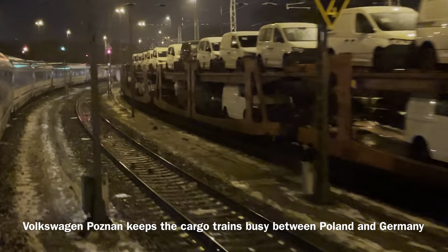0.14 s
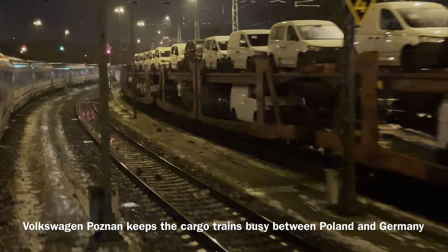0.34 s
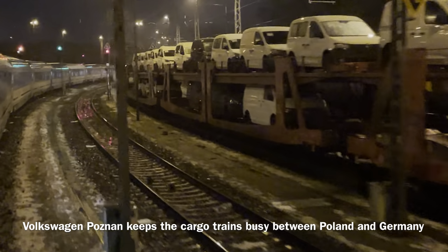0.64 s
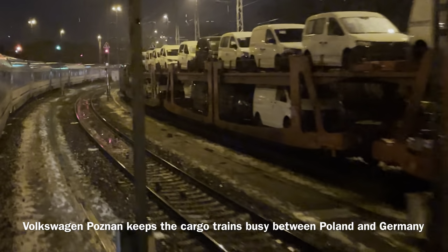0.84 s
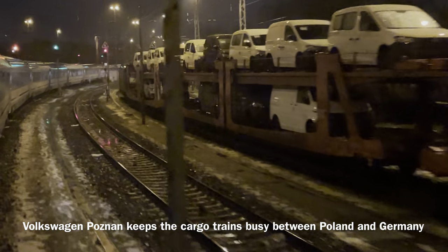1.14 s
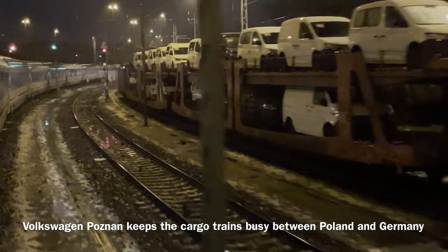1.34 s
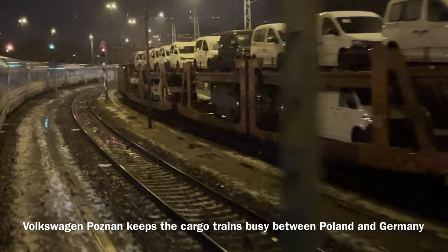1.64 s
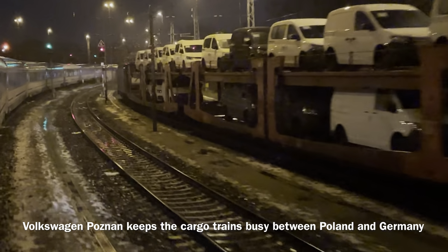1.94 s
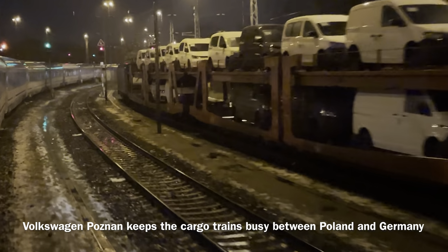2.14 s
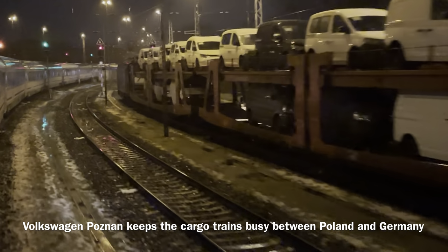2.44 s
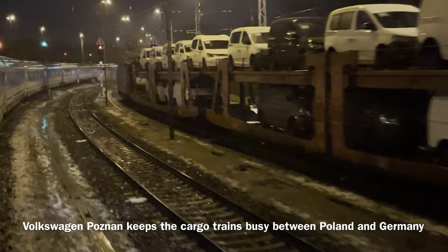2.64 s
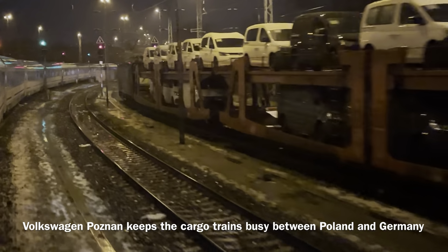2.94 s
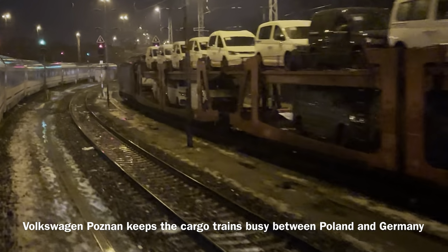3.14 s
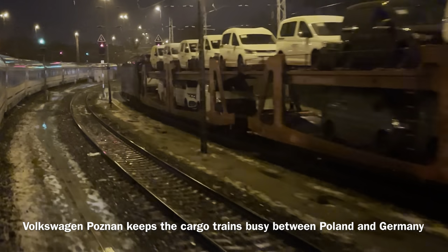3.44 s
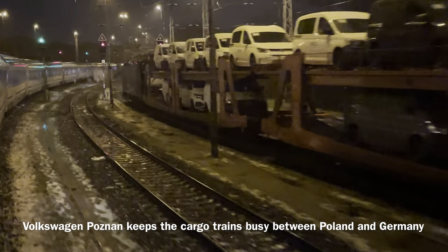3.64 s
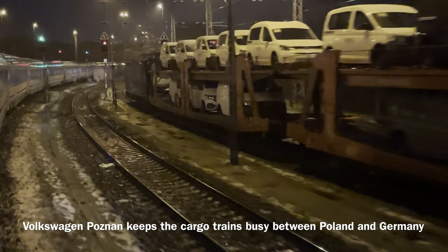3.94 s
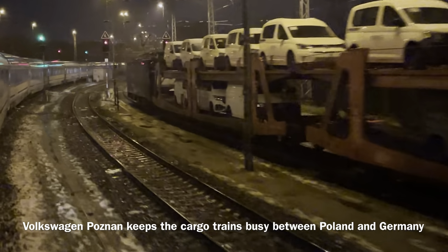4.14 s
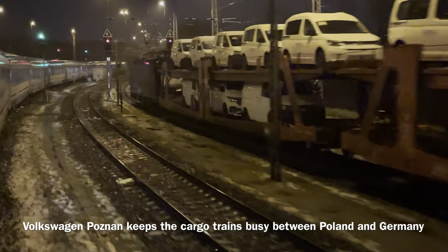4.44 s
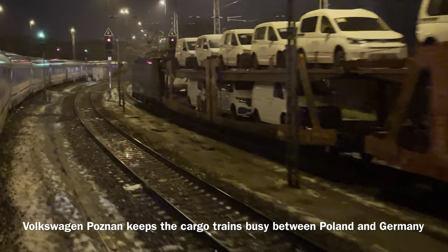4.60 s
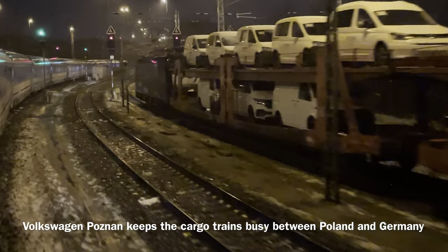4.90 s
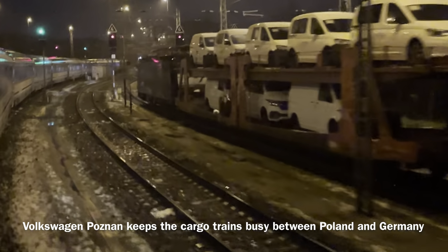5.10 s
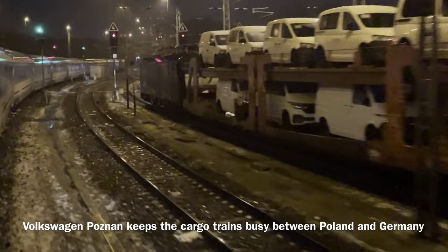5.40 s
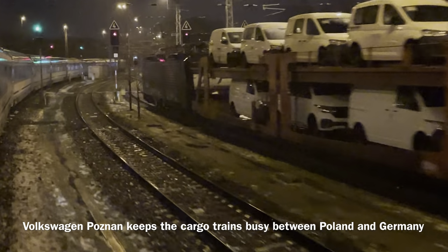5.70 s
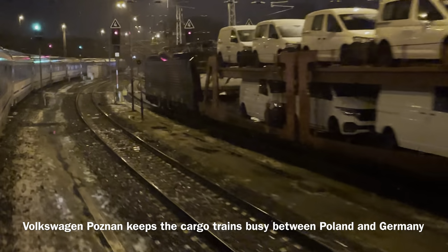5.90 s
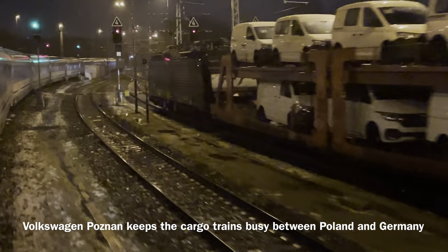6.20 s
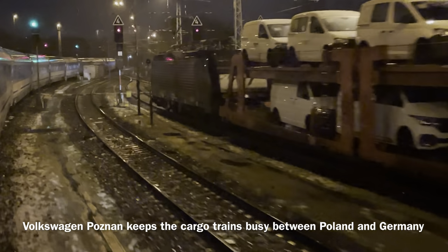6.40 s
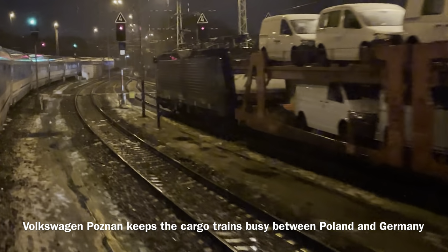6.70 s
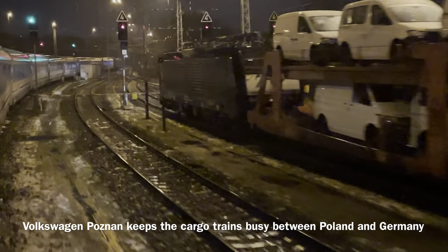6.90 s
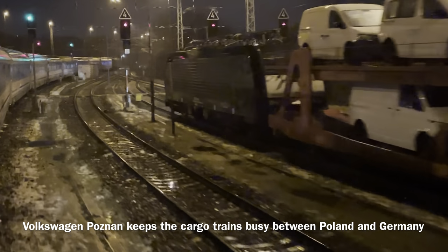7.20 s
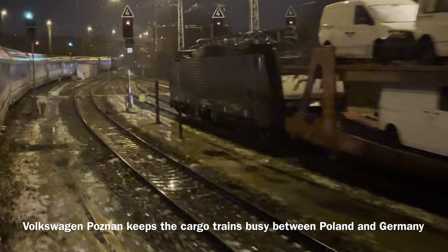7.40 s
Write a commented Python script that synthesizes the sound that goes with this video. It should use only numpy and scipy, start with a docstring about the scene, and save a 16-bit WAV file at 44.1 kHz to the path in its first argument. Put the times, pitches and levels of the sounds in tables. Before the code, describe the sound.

Heard at the window inside a passenger train rolling through a yard at night: a deep swaying rumble and juddering wheel roar, crowded with uneven knocks ringing dully through wall panels. A high airy whine with thin wavering whistles runs throughout. The fan noise of a locomotive on the next track gradually comes closer, and a sharp, bright knock stands out near the end.

```python
"""The wheels of a passenger train rumble through a yard at night, heard at a window.
Shaped noise makes the rumble, the heaves and the rolling roar; short blows knock through the panels.
A blower whines above: noise gives its hiss and duct resonances, wavering sines its thin whistles.
The fans of a locomotive on the next track, noise and one tone, slowly draw near.
"""
import sys
import numpy as np
from scipy.fft import rfft, irfft, next_fast_len
from scipy.io import wavfile
from scipy.ndimage import uniform_filter1d, map_coordinates

SR = 44100
rng = np.random.default_rng(int(sys.argv[2]) if len(sys.argv) > 2 else 0)


def transcribe(signal):
    """Save signal, clipped to [-1, 1], as a 16-bit WAV file at the path in sys.argv[1]."""
    frames = np.atleast_2d(signal).T
    limited = np.clip(frames, -1, 1)
    pcm = np.round(limited * 32767).astype(np.int16)
    wavfile.write(sys.argv[1], SR, pcm)


N = 332955


def amp(db):
    """Turn decibels into a gain."""
    return 10 ** (np.asarray(db) / 20)


def unit(x):
    """Scale to rms 1."""
    return x / np.sqrt(np.mean(x ** 2) + 1e-20)


def along(points, hz):
    """Read a value between (frequency, value) points, on a log frequency axis."""
    point_hz, values = np.transpose(points)
    return np.interp(np.log(hz + 1), np.log(point_hz + 1), values)


def curves(rows):
    """Give one value per sample for each column after the time."""
    times, *columns = np.transpose(rows)
    return [np.interp(np.arange(N) / SR, times, column) for column in columns]


def wobble(rate):
    """A smooth random curve through `rate` random points a second."""
    points = rng.standard_normal(int(N * rate / SR) + 4)
    return map_coordinates(points, [np.arange(N) * rate / SR])


def swell(s, rise, fall):
    """A bell-shaped envelope that peaks at time s; rise and fall in seconds."""
    t = np.arange(N) / SR - s
    return np.exp(-(t / np.where(t < 0, rise, fall)) ** 2)


def filtered(x, response):
    """Shape the spectrum of x by a complex response of frequency."""
    size = next_fast_len(N + SR // 2)
    hz = np.fft.rfftfreq(size, 1 / SR)
    return irfft(rfft(x, size) * response(hz), size)[..., :N]


def steadied(x, span):
    """Even out the chance swells of x that last longer than span seconds, near rms 1."""
    power = np.mean(x ** 2, axis=0)
    for _ in range(2):
        power = np.abs(uniform_filter1d(power, max(int(span * SR), 1)))
    return x / np.sqrt(power + 1e-20)


def tone(hz, waver_hz):
    """A sine of rms 1 whose pitch wavers."""
    pitch = hz + waver_hz * wobble(40)
    return np.sqrt(2) * np.sin(2 * np.pi * np.cumsum(pitch) / SR)


# how alike left and right are: (frequency [Hz], likeness [0 to 1])
LIKENESS = [(60, 0.92), (250, 0.88), (500, 0.86), (800, 0.34), (1250, 0.059), (1600, 0.67), (2000, 1),
            (4500, 1), (5600, 0.85), (6500, 0.89), (8300, 0.95), (10000, 0.54), (12500, 0.99)]


def diffuse(gain):
    """Noise of density gain(Hz) on the left and right, made partly alike by mixing mid and side."""
    def shape(hz):
        turn = np.arccos(np.clip(along(LIKENESS, hz), 0, 1)) / 2
        return gain(hz) * np.array([np.cos(turn), np.sin(turn)])

    white = rng.standard_normal((2, N)) * np.sqrt(SR / 2)
    mid, side = filtered(white, shape)
    return np.array([mid + side, mid - side])


def bending(hz, spread=0.00362, dispersion=0.751, lead=0.00364):
    """Bending waves cross the panels: the treble arrives first, the thud last."""
    ratio = np.maximum(hz, 50) / 420
    delay = spread * ratio ** -dispersion - lead  # seconds
    return np.exp(-2j * np.pi * np.cumsum(delay) * (hz[1] - hz[0]))


# ringing of the wall panels: (frequency [Hz], width [Hz], level [dB])
PANEL_MODES = [(241.7, 13.7, 2.5), (528, 27, -15.5)]


def panels(hz):
    """The wall panels pass a blow on and ring after it."""
    ring = 1
    for centre, width, db in PANEL_MODES:
        ring = ring + amp(db) * 1j * hz * width / (centre * centre - hz * hz + 1j * hz * width)
    return ring * bending(hz)


# how hard the track shakes the car, before gains:
# (time [s], bass level [dB], rolling noise level [dB])
RIDE_LEVELS = [(0, -36, -34), (.5, -37.5, -34), (1.01, -39.5, -38.5), (1.8, -38, -34.5),
               (2.71, -31.5, -32.5), (3.15, -38, -34.5), (3.66, -29, -34), (3.9, -34, -36.5),
               (4.45, -31, -34), (4.8, -31.5, -36), (5.23, -37, -32.5), (5.7, -33, -33), (6.4, -34, -31.5),
               (6.83, -37, -34.5), (7.19, -25.5, -31.5), (7.55, -30, -33)]
# colour of the car body's boom: (frequency [Hz], relative density [dB])
BOOM_COLOUR = [(12, -39), (25, -11), (38, -7.5), (55, 0.8), (80, 0.5), (120, -5.5), (180, -14.5),
               (300, -35), (600, -82)]
# low thumps as the car body heaves on its bogies: (time [s], level before gain [dB])
HEAVE_THUMPS = [(.48, -29), (.71, -30), (.93, -26.5), (1.14, -29.5), (1.26, -31.5), (1.37, -28),
                (1.47, -27), (1.91, -29), (2.16, -22.5), (2.31, -27.5), (2.43, -24), (3.19, -22),
                (3.34, -28.5), (3.56, -24), (4.48, -26.5), (5.45, -28), (5.75, -26), (6.35, -26.5),
                (6.48, -22), (6.67, -24), (7.01, -25), (7.19, -24), (7.3, -26), (7.45, -27)]
HEAVE_RISE_S, HEAVE_FALL_S = 0.026, 0.034


def rumble(bed_db=1.0, heave_db=1.0, sway_db=2.5, sway_rate=18):
    """The car body booms on its bogies: a swaying bed, and a thump at each heave."""
    bass_db, _ = curves(RIDE_LEVELS)
    bed = amp(bass_db + bed_db + sway_db * wobble(sway_rate))
    heaves = sum(amp(db + heave_db) * swell(s, HEAVE_RISE_S, HEAVE_FALL_S) for s, db in HEAVE_THUMPS)
    boom = diffuse(lambda hz: amp(along(BOOM_COLOUR, hz)))
    return np.hypot(bed, heaves) * steadied(boom, span=0.07)


# colour of the rolling roar: (frequency [Hz], relative density [dB])
ROAR_COLOUR = [(80, -28), (140, -5.5), (190, -4.5), (240, -1.5), (320, -1.5), (400, -5), (510, -2.5),
               (620, -9.5), (820, -8), (1000, -15), (1350, -23.5), (1900, -34), (4000, -42.5)]
# colour of a blow, for the soft taps here and the knocks below: (frequency [Hz], relative level [dB])
BLOW_COLOUR = [(20, -25), (60, -9), (120, -3.5), (190, 2.5), (300, 4.5), (480, 1.5), (650, -7), (950, -16),
               (1400, -25), (2200, -35), (4000, -70)]


def rolling(gain_db=-0.44, judder_db=1.7, heave_db=1.4, taps_db=-3.0, taps_rate=26, scatter_db=4,
            soft_hz=560):
    """Rough steel rolls on steel: a juddering roar, with soft thuds from pits in the rail."""
    def thud(hz):
        softness = np.sqrt(1 + (hz / soft_hz) ** 6)
        return amp(along(BLOW_COLOUR, hz)) * panels(hz) / softness

    _, level_db = curves(RIDE_LEVELS)
    roar = diffuse(lambda hz: amp(along(ROAR_COLOUR, hz)))
    roar = roar * amp(judder_db * wobble(70) + heave_db * wobble(14))
    sizes = rng.choice([-1, 1], N) * amp(scatter_db * rng.uniform(-1.6, 1, N))
    pits = (rng.random(N) < taps_rate / SR) * sizes  # about taps_rate a second
    taps = filtered(pits, thud)
    return amp(level_db) * (amp(gain_db) * unit(roar) + amp(taps_db) * unit(taps))


# blower and duct resonances: (frequency [Hz], width [Hz], density [dB per Hz])
DUCT_RESONANCES = [(1532, 73, -74), (1645, 59, -71.5), (1755, 29, -76), (2263, 100, -77), (2790, 70, -77),
                   (2850, 72, -62), (2937, 193, -70), (3144, 193, -68), (3340, 140, -77),
                   (4124, 174, -75.5), (4255, 46, -74), (6062, 246, -78.5), (8330, 110, -77.5),
                   (12400, 300, -87.5)]
# colour of the air hiss: (frequency [Hz], density [dB per Hz])
HISS_COLOUR = [(500, -100), (1300, -83), (1900, -86), (2500, -83.5), (3700, -100.5), (4600, -93),
               (5500, -95), (7400, -95.5), (9000, -92), (10200, -100.5), (11500, -97), (12700, -99)]


def blower(duct_db=0, hiss_db=0, flutter_db=0.47):
    """Air hisses through the ducts and sings in their resonances."""
    def peaks(hz):
        power = 0
        for centre, width, db in DUCT_RESONANCES:
            power = power + (amp(db) / (1 + ((hz - centre) / width) ** 2 * 2)) ** 2
        return np.sqrt(power)

    song = diffuse(peaks) * amp(duct_db + flutter_db * wobble(14))
    hiss = diffuse(lambda hz: amp(along(HISS_COLOUR, hz)))
    return song + hiss * amp(hiss_db + 0.33 * wobble(8))


# strongest whistle, before gain and wavering: (time [s], level [dB])
WHISTLE_LEVEL = [(0, -53), (.3, -47.5), (.65, -37), (.9, -45), (1.3, -45.5), (1.57, -40), (1.9, -45.5),
                 (2.55, -46.5), (2.8, -38.5), (3.2, -50.5), (4.4, -40.5), (4.6, -44), (5.15, -39),
                 (5.62, -47.5), (6.2, -39.5), (6.67, -43.5), (6.85, -57), (7.55, -44)]
# fainter whistles, before wavering: (frequency [Hz], level [dB])
FAINT_WHISTLES = [(3153, -56), (4147, -59), (6002, -68)]


def whistle(pitch_hz=2851, gain_db=-0.6, drift_db=1, drift_rate=7, flutter_db=0.9):
    """A few duct resonances lock into thin, wavering tones."""
    level_db, = curves(WHISTLE_LEVEL)
    level_db = level_db + gain_db + drift_db * wobble(drift_rate) + flutter_db * wobble(25)
    main = amp(level_db) * tone(pitch_hz, waver_hz=4.39)
    faint = sum(amp(db + 4.5 * wobble(7)) * tone(hz, waver_hz=4.93) for hz, db in FAINT_WHISTLES)
    return main + faint


# nearness of the locomotive: (time [s], level [dB])
NEARNESS = [(0, -7), (5, -3.5), (7.55, -0.5)]
# colour of its fans, before nearness: (frequency [Hz], density [dB per Hz])
FAN_COLOUR = [(200, -62), (700, -68), (1200, -73), (2000, -79.5), (4000, -84.5), (7000, -93.5),
              (11000, -99), (12800, -93)]


def locomotive(tone_hz=1256, tone_db=-54):
    """Cooling fans and their tone swell with nearness."""
    near_db, = curves(NEARNESS)
    fans = diffuse(lambda hz: amp(along(FAN_COLOUR, hz)))
    hum = amp(tone_db + 1.5 * wobble(6)) * tone(tone_hz, waver_hz=2.93)
    return amp(near_db) * (fans + hum)


# swells of a hollow drone: (time [s], level before gain [dB], half length [s])
DRONE_SWELLS = [(0.045, -24, 0.028), (1.56, -30.5, 0.081), (1.735, -29.5, .07), (2.014, -31.5, 0.076),
                (4.16, -30, 0.026), (5.07, -27, 0.025), (5.52, -32.5, .11)]


def drone(centre_hz=238, width_hz=36, bed_db=-44, sway_db=2.0, gain_db=-1):
    """The lowest panel mode keeps humming as the car rolls, in hollow swells of narrow noise."""
    bed = amp(bed_db + sway_db * wobble(9.7))
    swells = sum(amp(db + gain_db) * swell(s, length, length) for s, db, length in DRONE_SWELLS)
    hum = diffuse(lambda hz: 1 / (1 + ((hz - centre_hz) / width_hz) ** 2) ** 2)
    return np.hypot(bed, swells) * steadied(hum, span=0.1)


# light knocks between the hard ones: strength is over the rolling noise, brightness is per octave
LIGHT_PER_S, LIGHT_OVER_ROLL_DB, LIGHT_SCATTER_DB = 7, 11.5, 2
LIGHT_BRIGHT_DB, LIGHT_BRIGHT_SCATTER_DB = -2, 5


def light_knocks(count=120):
    """Rows like HARD_KNOCKS at uneven times, stronger where the rolling noise is louder."""
    _, roll_db = curves(RIDE_LEVELS)
    times = (np.arange(count) + rng.random(count)) / LIGHT_PER_S
    scatter = 2 * rng.random((count, 2)) - 1
    rows = []
    for s, (hard, bright) in zip(times, scatter):
        if s * SR < N:
            strength_db = roll_db[int(s * SR)] + LIGHT_OVER_ROLL_DB + LIGHT_SCATTER_DB * hard
            rows.append((s, strength_db, LIGHT_BRIGHT_DB + LIGHT_BRIGHT_SCATTER_DB * bright))
    return rows


# hard knocks of the running gear:
# (time [s], level before gain [dB], brightness [dB per octave])
HARD_KNOCKS = [(0.047, -12, 0), (0.475, -13.5, -3), (0.693, -18, -1), (0.75, -17, -5.5), (0.917, -16, 4),
               (0.939, -16.5, 6), (1.036, -20, 0), (1.132, -16.5, 7), (1.182, -16.5, -1.5), (1.244, -14, 5),
               (1.432, -18, -2.5), (1.52, -16, 1), (1.725, -22.5, -13), (1.76, -20.5, -10),
               (1.886, -18.5, 4), (2.005, -15.5, -5), (2.044, -16, -6.5), (2.099, -15, -0.5),
               (2.166, -15.5, 1), (2.266, -16, -2), (2.312, -21, -8), (2.501, -14.5, -1.5),
               (2.543, -14, 2.5), (2.682, -15, 0), (2.726, -17, -6), (2.747, -15, 0), (2.89, -19, -3),
               (2.951, -18, 0), (3.042, -18, -3), (3.078, -18, -4), (3.541, -15.5, 0.5), (3.569, -19, 7),
               (3.713, -15.5, -3), (3.78, -16, 0.5), (3.845, -15, -1.5), (4.064, -17, -4),
               (4.152, -12.5, -3), (4.23, -18.5, 3.5), (4.286, -13, 0), (4.318, -16, 2.5), (4.339, -19, 9),
               (4.505, -16, 3), (4.547, -14.5, 1), (4.885, -17.5, 0), (4.981, -14, 2), (5.014, -14, -0.5),
               (5.051, -14.5, 1.5), (5.195, -20, 5), (5.437, -19.5, -11.5), (5.469, -13.5, -2),
               (5.499, -12.5, .5), (5.574, -18, -6.5), (5.652, -15, -3.5), (5.709, -16, 0.5),
               (5.732, -14, 4), (5.799, -16.5, -1), (5.926, -12.5, 2), (5.975, -15, 3), (6.067, -22, -3),
               (6.216, -13.5, -3), (6.254, -19.5, -3), (6.326, -16.5, 2), (6.346, -17, 0),
               (6.552, -8.5, 6.5), (6.715, -18, 0), (6.853, -13, 2.5), (6.934, -17.5, 2), (7.055, -14, 7.5),
               (7.085, -15.5, -4), (7.179, -15.5, 2), (7.201, -15, 5), (7.246, -16, 2), (7.26, -10.5, 1),
               (7.363, -17, -1), (7.462, -16, 2), (7.484, -15.5, 5)]


def knocks(gain_db=33.0, rattle=0.066, rattle_time=0.0056, soft_hz=1050, apart=0.0071, crack_hz=1900):
    """Short blows of the running gear, each with some dull, loose chatter, ring the panels."""
    size = 8192  # samples for one blow, which strikes a quarter of the way in
    hz = np.fft.rfftfreq(size, 1 / SR) + 1
    t = (np.arange(size) - size // 4) / SR
    octave = np.clip(np.log2(hz / 420), -1, 1.6)
    path = amp(along(BLOW_COLOUR, hz)) * panels(hz) / np.sqrt(1 + (hz / crack_hz) ** 12)
    dull = 1 / np.sqrt(1 + (hz / soft_hz) ** 4)
    click = rfft(1. * (t == 0))
    out = np.zeros((2, N + 2 * size))
    for s, db, bright_db in HARD_KNOCKS + light_knocks():
        chatter, side = rfft(rng.standard_normal((2, size)) * np.exp(-np.abs(t) / rattle_time))
        force = click + rattle * dull * chatter + apart * np.array([side, -side])
        colour = amp(db + gain_db + bright_db * octave) * path
        # the chatter shares out the blow's energy without adding to it
        energy = np.average(np.mean(np.abs(force) ** 2, 0), weights=np.abs(colour) ** 2)
        force = force / np.sqrt(energy)
        twist = np.exp(2j * np.pi * rng.random())  # every blow gets its own random phase
        start = max(round(s * SR), 0)
        out[:, start:start + size] += irfft(force * colour * twist)
    return out[:, size // 4:][:, :N]


# brief flares of the whine: (time [s], frequency [Hz], level [dB])
FLARES = [(2.06, 2850, -37.5), (2.2, 3140, -38.5), (2.28, 6000, -47), (2.27, 8300, -51),
          (3.03, 2850, -36.5), (3.83, 2850, -35), (4.17, 2280, -49), (5.08, 4130, -46), (5.23, 2300, -49.5),
          (7.37, 2850, -39.5)]


def squeak(length=0.046, width_hz=45):
    """Now and then one resonance of the whine flares for a moment, as a narrow band of noise."""
    out = np.zeros((2, N))
    for s, centre_hz, db in FLARES:
        band = diffuse(lambda hz: 1 / (1 + ((hz - centre_hz) / width_hz) ** 4))
        out += amp(db) * swell(s, length, length) * steadied(band, span=0.022)
    return out


def scene():
    """Add the blower's whine, the locomotive on the next track and the rolling car."""
    whine = blower() + whistle() + squeak()
    car = rumble() + rolling() + drone() + knocks()
    return whine + locomotive() + car


# how far the left port runs ahead: (frequency [Hz], phase [radians])
LEFT_LEAD = [(300, .1), (700, .45), (1100, 1.2), (1500, -.3), (2000, 0), (2850, .25), (3600, .05),
             (4800, .1), (5700, .8), (6700, .2), (7900, 2.8), (8800, 2.8), (10400, 0), (11500, -.2),
             (12500, -2.5)]
# how much louder the left port is: (frequency [Hz], level [dB])
LEFT_LOUDER = [(100, 0), (700, -0.6), (1150, 2.5), (1450, 2.5), (1750, 0), (2000, 0)]
TOP_HZ = 12950


def record(dry, low_hz=37):
    """The two ports hear the sound out of step; the deepest bass and the top are cut."""
    sides = np.array([[.5], [-.5]])  # each port takes half the difference

    def response(hz):
        ports = np.exp(1j * along(LEFT_LEAD, hz) * sides) * amp(along(LEFT_LOUDER, hz) * sides)
        bass_cut = np.sqrt(1 - 1 / (1 + (hz / low_hz) ** 6))
        return ports * bass_cut * (hz < TOP_HZ)

    return filtered(dry, response)


dry = scene()
out = record(dry)
transcribe(out)
```